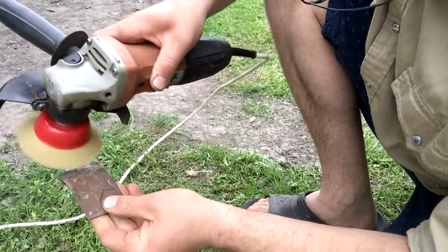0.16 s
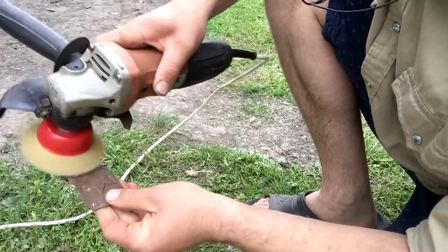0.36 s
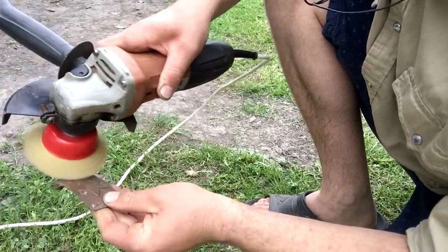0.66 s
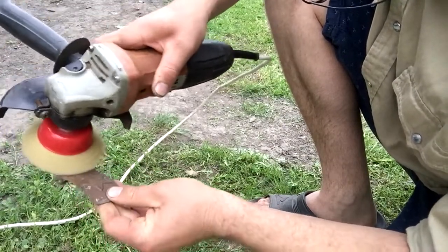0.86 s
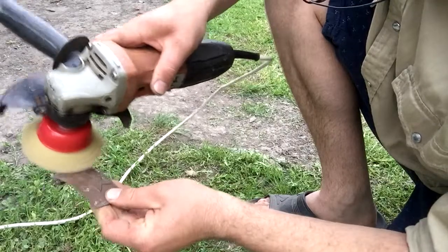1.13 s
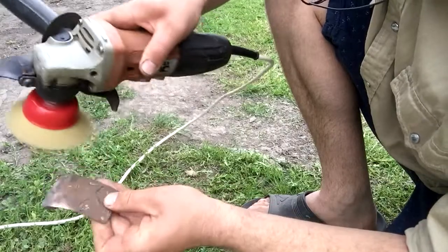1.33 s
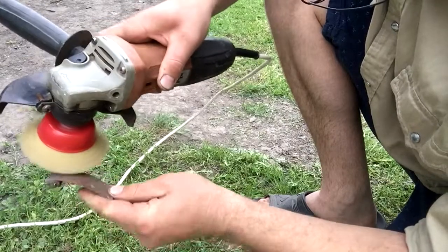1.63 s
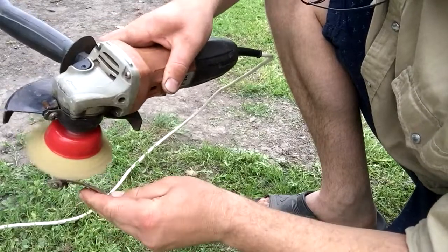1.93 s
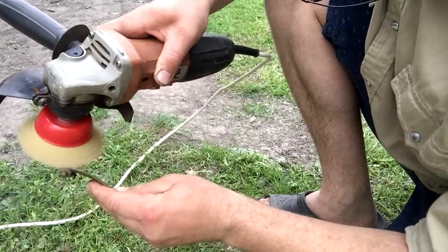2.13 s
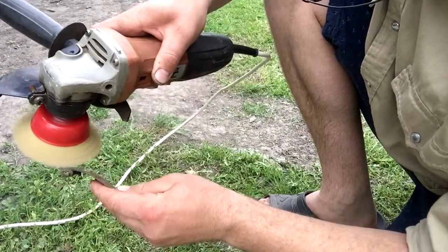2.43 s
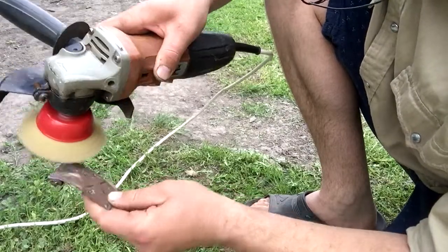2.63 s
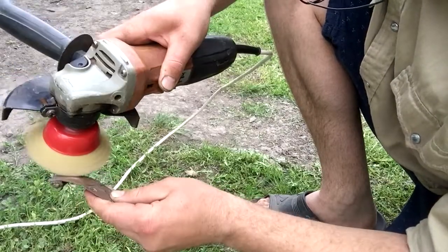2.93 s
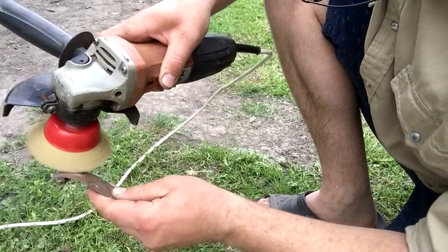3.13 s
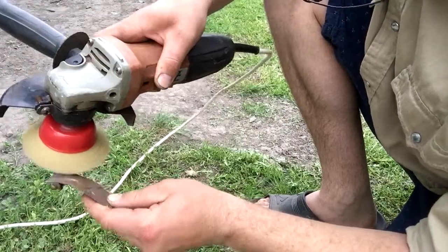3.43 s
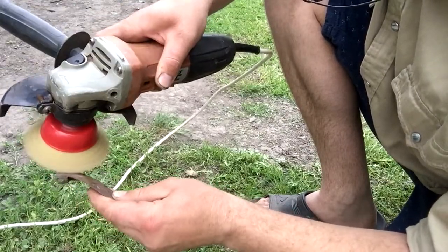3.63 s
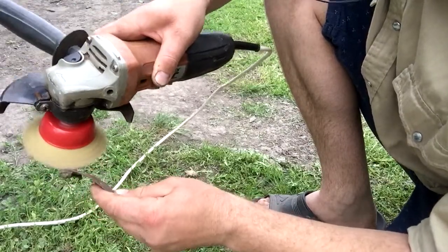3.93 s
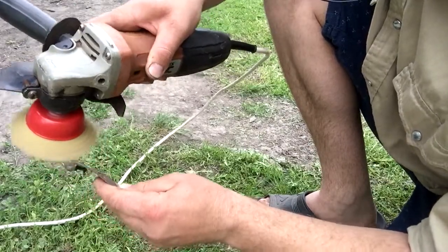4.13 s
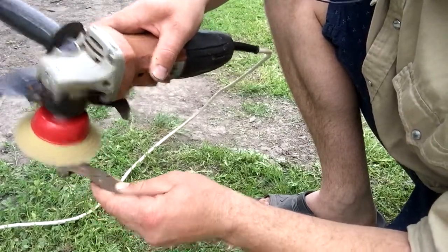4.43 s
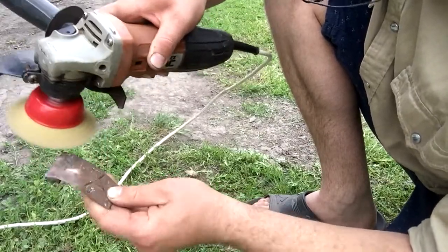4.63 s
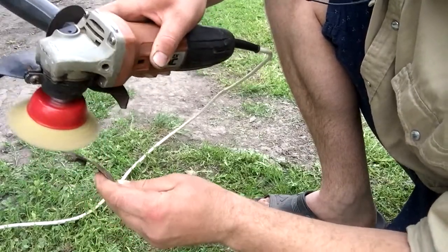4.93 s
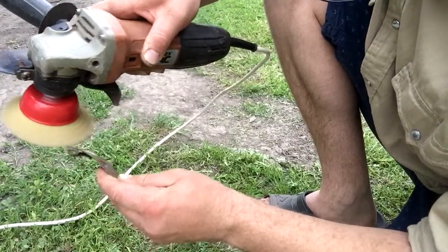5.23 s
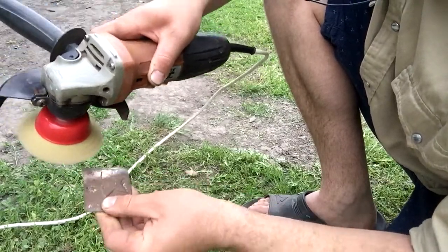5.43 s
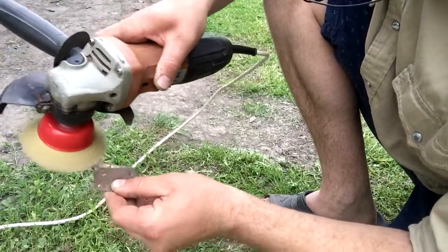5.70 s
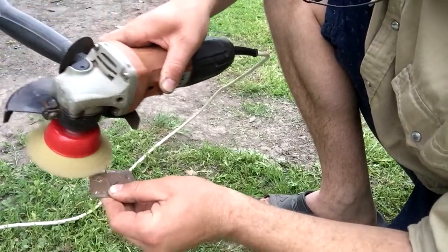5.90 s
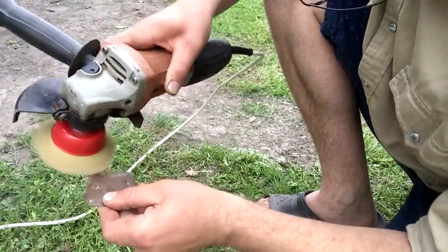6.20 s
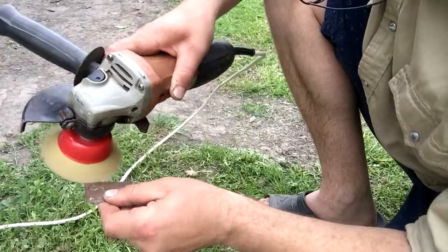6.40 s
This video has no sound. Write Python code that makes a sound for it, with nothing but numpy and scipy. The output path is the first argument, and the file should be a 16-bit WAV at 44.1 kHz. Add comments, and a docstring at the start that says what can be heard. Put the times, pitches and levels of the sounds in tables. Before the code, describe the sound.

An angle grinder is already at full speed, very close and dry in open air. Its shrill, rough gear whine wavers only slightly while the wire brush skims a steel plate with a bright hiss. From under two seconds the plate is pressed in repeatedly; each press drags the pitch down, and each release lets it climb quickly. It never stops.

```python
"""Outdoors, close by: a corded angle grinder with a wire cup brush skims a steel plate, which is then pressed in
again and again. The motor drives the spindle through bevel gears; each touch drags the speed down and slides the
gear whine, built from sines, across the fixed resonances of the gear housing. Filtered noise makes the tooth
clatter, bristle swish and ticks; a wavering sine makes a high motor whistle."""
import sys
import numpy as np
from scipy import signal
from scipy.fft import rfft, irfft, next_fast_len
from scipy.io import wavfile

SR = 44100
rng = np.random.default_rng(int(sys.argv[2]) if len(sys.argv) > 2 else 0)


def to_wav(s):
    """Save 16-bit WAV."""
    ch = np.atleast_2d(s).T  # columns
    pcm = np.round(np.clip(ch, -1, 1) * 32767)  # PCM
    wavfile.write(sys.argv[1], SR, pcm.astype(np.int16))


N = 289296
TIME_S = np.arange(N) / SR

# Unbalance of the two shafts. Each row: cycles per motor turn, cycles per spindle turn, mean level in dB at load 0,
# change in dB per unit of load.
HUM_PARTIALS = [(0, 1, -74, -4), (0, 2, -72, 4), (1, -1, -75, 0), (0, 3, -79, 0), (1, 0, -62, 3),
                (1, 2, -72.5, -8), (2, -1, -79, 6), (2, 0, -76, 0), (3, -1, -73, -2), (3, 0, -60, -4),
                (3, 1, -72, -2), (4, 0, -71, -2), (0, 18, -60, -2)]
# Gear partials before drive and housing. Each row: cycles per motor turn, cycles per spindle turn,
# relative level in dB at load 0, change in dB per unit of load.
GEAR_PARTIALS = [(0, 19, -55, -12), (6, -2, -52, -15), (6, -1, -50, -13), (6, 0, -59, 3), (7, -1, -59, -7),
                 (7, 0, -53, -4), (8, -3, -58, -11), (8, -2, -57, 2), (8, 0, -57, 5), (0, 30, -58, -3),
                 (9, -3, -59, -6), (8, 1, -62, -8), (9, -2, -64, 0), (8, 2, -57, 0), (9, -1, -46.5, 0),
                 (0, 33, -58, 0), (9, 0, -49.5, 4), (9, 1, -60, 2), (10, -2, -69, 7), (9, 2, -66, 8),
                 (10, -1, -64, 12), (10, 0, -47.5, 3), (10, 1, -52, 1), (11, -2, -62, 2), (10, 2, -54, 0),
                 (11, -1, -58, 1), (10, 3, -63, 4), (11, 0, -44.5, 6), (11, 1, -50, -3), (11, 2, -65, -10),
                 (12, 0, -55, -1), (13, 0, -66, 7), (14, 0, -66, 6), (19, 0, -72, 9), (20, -1, -75, 10),
                 (20, 0, -73, 9), (20, 1, -77, 9)]
# Resonances of the gear housing. Each row: centre in Hz, width in Hz, peak gain in dB.
HOUSING_MODES = [(3592, 78, 8), (4076, 85, 9), (4428, 230, 5), (5171.4, 40.6, 14), (5736, 190, 4.5),
                 (6440, 40, 7), (7000, 98, 5.5), (7240, 240, 6), (9420, 110, 3), (10140, 76, 0),
                 (10820, 99, -1.5), (11400, 200, 0), (12600, 250, -1.5), (13900, 170, -9.5)]
# Noise colours ahead of the housing: bristles and air, knocking teeth, wire tips.
# Each row: frequency in Hz, relative gain in dB.
SWISH_COLOUR = [(30, -51), (100, -37), (200, -21.5), (350, -16), (650, -16.5), (1100, -5), (1450, -5),
                (1700, -6), (2200, -3.5), (2800, 1.5), (3300, -4.5), (4200, -29), (8000, -41)]
CLATTER_COLOUR = [(1000, -19.5), (2800, -23), (3300, -2.5), (3600, 4), (4200, 4.5), (5000, 3), (5800, -3),
                  (6600, -8.5), (9000, -22)]
TICK_COLOUR = [(3000, -24), (5500, -6), (6200, 3.5), (7000, -1.5), (8200, 0), (10000, -3), (11500, -2.5),
               (13500, -3), (15500, -4.5)]
# Wire tips skim the plate face: much swish, little drag. Each row: time in seconds, mean drag on the motor in Hz.
SKIM_DRAG = [(0, 17), (.45, 5.5), (.85, 22.7), (1.17, 27.7), (1.36, 13.7), (1.62, 10)]
# The plate pressed into the brush, sometimes shifted straight to a new spot.
# Each row: start in seconds, end in seconds, attack in seconds, mean drag at first in Hz, mean drag at last in Hz,
# tooth mesh in dB, pinion wobble in dB, crown wheel wobble in dB, tooth clatter in dB,
# brief change of the whine on biting in dB, on letting go in dB.
PRESSES = [(1.683, 2.189, 0.33, 74.66, 61.26, 3, -9, -4.5, -42, 3, -3.5),
           (2.203, 2.545, 0.023, 44.87, 27.51, 4, -0.5, 0, -45.5, -2.5, -7),
           (2.716, 3.32, 0.25, 63.3, 64.62, 5, -6, -4, -42.5, 1, -13),
           (3.48, 3.829, 0.17, 62.87, 49.73, 2.5, -5.5, -2.5, -42.5, 0.5, -5),
           (3.836, 4.49, 0.031, 44.1, 42.47, 0, -1.7, -0.3, -43, -0.8, -11),
           (4.776, 5.282, 0.099, 33.48, 26.7, 7, -1.5, 2.5, -46, -14, -5.5),
           (5.531, 5.798, .114, 38.3, 21.87, 6, 1.5, -4, -39, -5.5, -.7),
           (5.791, 6.078, .037, 41.6, 46.4, 3, -1.4, 1.2, -41.5, 0, -9),
           (6.246, 6.56, 0.2, 55.96, 65.13, -2, -9, -1.5, -38, 0.5, 0)]

PINION_TEETH, WHEEL_TEETH, MAINS_HZ = 10, 37, 50
WHISTLE_ORDER = 31  # cycles per motor turn
TOP_SPEED_HZ, INERTIA_S = 518.2, 0.077  # motor turns per second without drag; time constant
LOAD_0_HZ, LOAD_1_HZ = 504.2, 468.5  # motor speeds under light and heavy load
SKIM_END_S, SKIM_RELEASE_S, PRESS_RELEASE_S = 1.628, 0.0088, 0.037
HAND_WAVER, HAND_RATE_HZ = 0.0246, 16  # unsteady hand: share of the drag, changes per second
SWELL_DB, SWELL_RATE_HZ = 0.6, 16  # random swell of the whine, growing with load up to load 1
# In the air, skimming; the pressed levels are in PRESSES.
MESH_DB, PINION_DB, CROWN_DB, CLATTER_DB = (6.5, 5), (1, 1.7), (-4, 0.7), (-43, -37.5)
# In the air, skimming, pressed.
SWISH_DB, TICK_DB, WHISTLE_DB = (-48.5, -42.5, -50), (-53, -44, -53.5), (-70, -58.5, -60)
SKIM_BITE_DB = 1  # extra swish while skimming, per unit of load
# Teeth run slack as the load comes or goes: delay in seconds, half length in seconds.
PRESS_SLACK_S, RELEASE_SLACK_S, SKIM_SLACK_S = (0.097, 0.072), (0.053, 0.045), (0.011, 0.0061)
SKIM_SLACK_DB = -13
SLACK_ROUGH_SHARE = 0.14  # share of the slack in the clatter and bristle noise
# Centre in Hz, width in Hz, gain in dB.
HOUSING_NOTCH = (5084, 77, -8)  # dead spot just below the strongest resonance
WHISTLE_MODE = (14900, 300, 8.1)  # the motor whistle glides through it
TOP_HZ = 15700


def undb(db):
    """Decibels to gain."""
    return 10 ** (np.asarray(db) / 20)


def unit(x):
    """Scale to rms 1."""
    return x / np.sqrt(np.mean(x ** 2))


def walk(rate_hz):
    """Smooth chance with a spread near 1, turning about rate_hz times a second."""
    return 1.2 * np.interp(TIME_S * rate_hz, np.arange(4096), rng.standard_normal(4096))


def tone(turns):
    """Sine of rms 1 starting at a random phase."""
    phase = 2 * np.pi * ((turns + rng.random()) % 1)
    return np.sqrt(2) * np.sin(phase.astype(np.float32))


def bell(hz, centre_hz, width_hz, db):
    """Resonance peak or notch, in dB."""
    return db / (1 + (2 * (hz - centre_hz) / width_hz) ** 2)


def dip(event_s, delay_s, half_s):
    """Short bump, 0 to 1, peaking delay_s after the event."""
    return np.exp(-np.minimum(np.abs(TIME_S - event_s - delay_s) / half_s, 10) ** 2)


def shape(x, gain_at):
    """Filter by a gain that depends on frequency."""
    size = next_fast_len(N + SR // 10)
    hz = np.arange(size // 2 + 1) * SR / size + 1  # +1 keeps log(hz) finite
    return irfft(rfft(x, size) * gain_at(hz), size)[:N]


def colour(x, points):
    """Filter by (Hz, dB) points, straight lines over log frequency."""
    point_hz, point_db = np.transpose(points)
    return shape(x, lambda hz: undb(np.interp(np.log(hz), np.log(point_hz), point_db)))


def housing(x, between_db=-5):
    """Cast gear head: the power of the resonance peaks adds to an even response."""
    def gain_at(hz):
        power = undb(between_db) ** 2
        for centre_hz, width_hz, db in HOUSING_MODES:
            power = power + undb(db) ** 2 / (1 + (2 * (hz - centre_hz) / width_hz) ** 2)
        return np.sqrt(power)
    return shape(x, gain_at)


def skimming():
    """1 while the bristles skim the plate, then 0."""
    return np.clip(1 - (TIME_S - SKIM_END_S) / SKIM_RELEASE_S, 0, 1)


def contact(start_s, end_s, attack_s):
    """One press, 0 to 1: attack, hold, release."""
    attack = np.clip((TIME_S - start_s) / attack_s, 0, 1)
    return attack * np.clip(1 - (TIME_S - end_s) / PRESS_RELEASE_S, 0, 1)


def by_contact(air_db, skim_db, press_db):
    """Level moving between air, skimming and pressing (press_db: one value, or one per press)."""
    db = air_db + (skim_db - air_db) * skimming()
    for (start_s, end_s, attack_s, *_), pressed_db in zip(PRESSES, np.broadcast_to(press_db, len(PRESSES))):
        db = db + (pressed_db - air_db) * contact(start_s, end_s, attack_s)
    return db


def motor_speed():
    """Drag pulls the motor below its top speed; rotor inertia smooths every change."""
    drag_hz = np.interp(TIME_S, *np.transpose(SKIM_DRAG)) * skimming()
    for start_s, end_s, attack_s, first_hz, last_hz, *_ in PRESSES:
        press_hz = np.interp(TIME_S, [start_s + attack_s, end_s], [first_hz, last_hz])
        drag_hz = drag_hz + contact(start_s, end_s, attack_s) * press_hz
    drag_hz = drag_hz * (1 + HAND_WAVER * walk(HAND_RATE_HZ))
    keep = np.exp(-1 / (INERTIA_S * SR))
    lagged_hz = drag_hz[0] + signal.lfilter([1 - keep], [1, -keep], drag_hz - drag_hz[0])
    return TOP_SPEED_HZ - lagged_hz


def slack():
    """Brief level change in dB, mostly a drop, as the teeth lose their grip at each change of load."""
    db = SKIM_SLACK_DB * dip(SKIM_END_S, *SKIM_SLACK_S)
    for start_s, end_s, *_, bite_db, release_db in PRESSES:
        db = db + bite_db * dip(start_s, *PRESS_SLACK_S)
        db = db + release_db * dip(end_s, *RELEASE_SLACK_S)
    return db


def hum(motor, spindle, load, waver_db=2.0):
    """Low tones of the unbalanced rotor and brush, at sums of shaft rates."""
    out = 0
    for a, b, db, load_db in HUM_PARTIALS:
        level_db = db + load_db * load + waver_db * walk(8)
        out = out + undb(level_db) * tone(a * motor + b * spindle)
    return out


def motor_whistle(motor, motor_hz, load, ripple_turns=0.09, flutter_turns=0.08, flicker_db=3.5, pulsing=0.12,
                  load_db=2):
    """High whistle locked to the motor, flickering, louder under load; torque pulses twice per mains cycle shake it."""
    level_db = by_contact(*WHISTLE_DB) + bell(WHISTLE_ORDER * motor_hz, *WHISTLE_MODE)
    level_db = level_db + load_db * np.minimum(load, 1) + flicker_db * walk(55)
    torque = tone(2 * MAINS_HZ * TIME_S)
    turns = WHISTLE_ORDER * motor + ripple_turns * torque + flutter_turns * walk(120)
    return undb(level_db) * (1 + pulsing * torque) * tone(turns)


def ticks(spindle, per_second=20000, scatter_db=1.0, sway=0.086):
    """Thousands of wire tips flick and scratch at random, merging into a hiss."""
    hits = rng.random(N) < per_second / SR
    flicks = hits * rng.standard_normal(N) * undb(scatter_db * rng.exponential(size=N))
    return unit(housing(colour(flicks * (1 + sway * tone(spindle)), TICK_COLOUR)))


def swish(motor, spindle, brush_sway=0.054, motor_sway=0.029, flutter_db=0.5):
    """Bristles and air rush round: noise pulsing with each turn of both shafts."""
    air = rng.standard_normal(N) * (1 + brush_sway * tone(spindle)) * (1 + motor_sway * tone(motor))
    return unit(housing(colour(air * undb(flutter_db * walk(60)), SWISH_COLOUR)))


def clatter(motor, spindle, pinion_sway=0.1, wheel_sway=0.14):
    """Teeth knock in their backlash, harder once per turn of each shaft, and ring the housing."""
    knocks = rng.standard_normal(N) * (1 + pinion_sway * tone(motor)) * (1 + wheel_sway * tone(spindle))
    return unit(housing(colour(knocks, CLATTER_COLOUR)))


def tooth_edges(motor, spindle, pinion_db, level_db=-55, fall_db=-0.25, waver_db=4, wobble=0.72):
    """Tooth differences repeat every motor turn: a thin buzz of harmonics following the pinion level by half."""
    out = 0
    for k in range(PINION_TEETH + PINION_TEETH // 2, 3 * PINION_TEETH):
        sway = 1 + wobble * (tone(spindle) + tone(2 * spindle) / 2)
        out = out + undb(fall_db * k + waver_db * walk(10)) * sway * tone(k * motor)
    return undb(level_db + pinion_db / 2) * unit(out)


def whine(motor, spindle, load, mesh_db, pinion_db, crown_db, waver_db=2.2, slip_turns=0.022, flutter_db=1.1):
    """Tooth mesh with sidebands, as neither pinion nor wheel runs true; load shifts their balance."""
    out = 0
    for a, b, db, load_db in GEAR_PARTIALS:
        if b:  # the brush shakes the wheel: its sidebands come and go
            drive_db = crown_db + waver_db * walk(9)
        elif a % PINION_TEETH:
            drive_db = pinion_db
        else:
            drive_db = mesh_db
        # backlash: flutter in strength, slip in phase
        flutter = undb(flutter_db * walk(45))
        partial = flutter * tone(a * motor + b * spindle + slip_turns * walk(50))
        out = out + undb(db + load_db * load + drive_db) * partial
    return out


def scene():
    """One motor speed turns everything; open air adds no echo."""
    motor_hz = motor_speed()
    load = (LOAD_0_HZ - motor_hz) / (LOAD_0_HZ - LOAD_1_HZ)
    motor = np.cumsum(motor_hz) / SR  # turns
    spindle = motor * PINION_TEETH / WHEEL_TEETH
    *_, press_mesh_db, press_pinion_db, press_crown_db, press_clatter_db, _, _ = np.transpose(PRESSES)
    slack_db = slack()

    swish_db = by_contact(*SWISH_DB) + SKIM_BITE_DB * load * skimming()
    rough = undb(swish_db) * swish(motor, spindle)
    rough = rough + undb(by_contact(*CLATTER_DB, press_clatter_db)) * clatter(motor, spindle)
    rough = rough + undb(by_contact(*TICK_DB)) * ticks(spindle)
    rough = undb(SLACK_ROUGH_SHARE * slack_db) * rough

    mesh_db = by_contact(*MESH_DB, press_mesh_db) + slack_db
    pinion_db = by_contact(*PINION_DB, press_pinion_db) + slack_db
    crown_db = by_contact(*CROWN_DB, press_crown_db) + slack_db / 2
    teeth = whine(motor, spindle, load, mesh_db, pinion_db, crown_db) + tooth_edges(motor, spindle, pinion_db)
    gears = housing(teeth) * undb(SWELL_DB * np.clip(load, 0, 1) * walk(SWELL_RATE_HZ))
    gears = shape(gears, lambda hz: undb(bell(hz, *HOUSING_NOTCH)))
    return (hum(motor, spindle, load) + motor_whistle(motor, motor_hz, load) + rough + gears)[None]


def record(dry):
    """Very steep low-pass at TOP_HZ."""
    return shape(dry[0], lambda hz: 1 / np.sqrt(1 + (hz / TOP_HZ) ** 800))[None]


dry = scene()
out = record(dry)
to_wav(out)
```